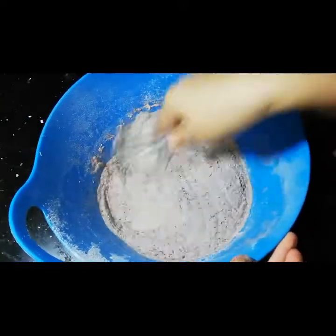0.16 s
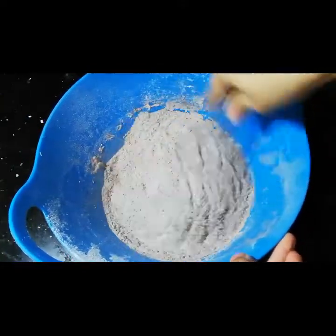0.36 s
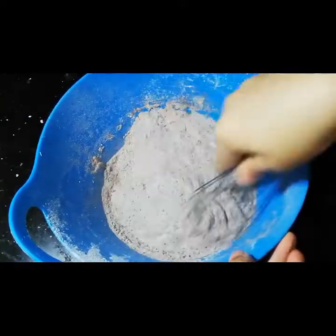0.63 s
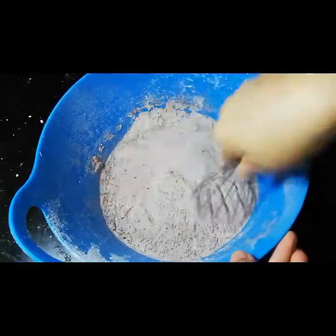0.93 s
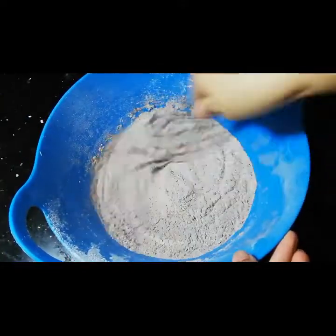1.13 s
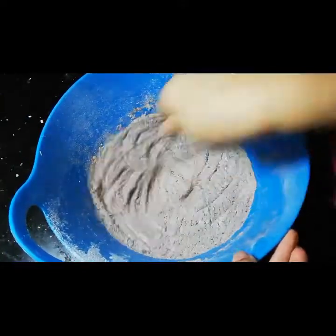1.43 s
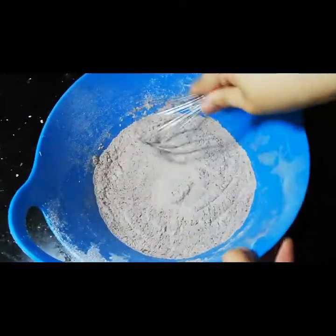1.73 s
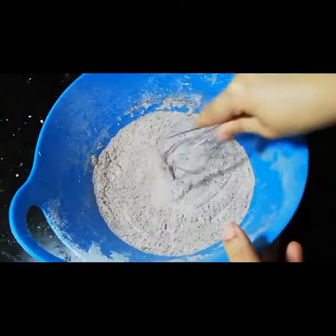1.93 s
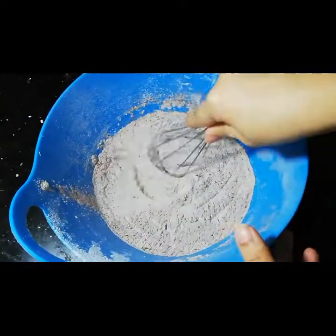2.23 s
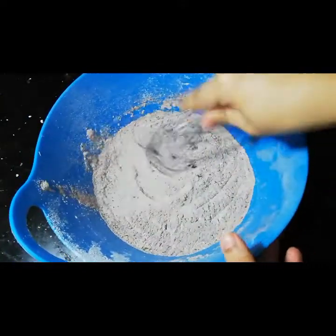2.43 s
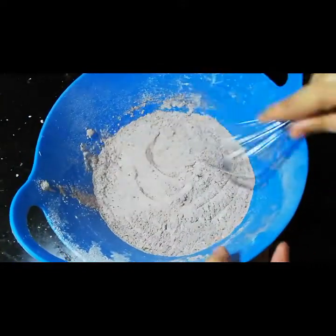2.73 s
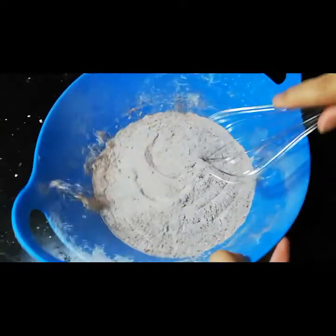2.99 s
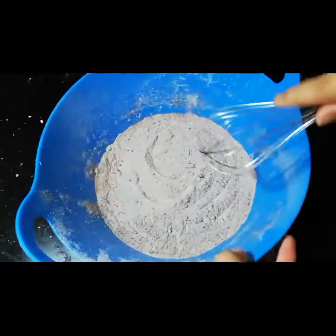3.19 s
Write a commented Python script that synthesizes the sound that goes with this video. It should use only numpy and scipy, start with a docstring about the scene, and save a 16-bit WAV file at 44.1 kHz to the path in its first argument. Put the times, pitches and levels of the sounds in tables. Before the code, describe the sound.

A wire whisk scrapes through dry powder in a plastic bowl with quick uneven strokes and small knocks, pauses, then is tapped clean on the wall; close stereo microphones in a small, quiet kitchen.

```python
"""Whisk in a powder bowl

A wire whisk scrapes in quick strokes through dry powder in a plastic bowl, then knocks and is tapped clean on
the wall. Dense noise grains, filtered and rung through bowl modes, make the hiss; damped sines and shaped noise
make the knocks; a sine hums in the wires after the taps with the strongest cracks. A small kitchen adds
decaying-noise echoes and a low rumble. Two spaced microphone ports pick it up, the right one with a bright
resonance."""
import sys
import numpy as np
from scipy import signal
from scipy.fft import rfft, irfft
from scipy.io import wavfile
from scipy.ndimage import uniform_filter1d

SR = 44100
rng = np.random.default_rng(int(sys.argv[2]) if len(sys.argv) > 2 else 0)


def dump(signal):
    """Clip the signal to [-1, 1] and save it as 16-bit WAV at the path in sys.argv[1]."""
    limited = np.clip(np.atleast_2d(signal).T, -1, 1)
    pcm = np.round(limited * 32767).astype(np.int16)
    wavfile.write(sys.argv[1], SR, pcm)


N = 147735  # length [samples]
TIME = np.arange(N) / SR  # [s]

# Tone of powder scraped by the wires: (frequency [Hz], relative density [dB per Hz])
SCRAPE_TONE = [(120, -85), (200, -22.5), (709, -12.5), (806, -2.5), (1140, -3), (1480, 5), (1810, -1),
               (2510, 2), (5130, -0.5), (7540, -13), (8740, -7), (14600, -18.5), (16000, -28)]
# Low modes of the bowl wall: (frequency [Hz], relative level [dB], T60 [s])
WALL_MODES = [(188, -19, 0.12), (320, 3.5, .04), (446, -5, 0.02), (620, 20, 0.075), (790, 34.5, 0.022),
              (848, 20, 0.09), (890, -34, 0.021), (1160, -11, 0.075), (1150, -7.5, 0.03)]
# Whisk against the bowl: (time [s], nominal peak [dB], thud [dB], thud centre [Hz], crack [dB],
# crack centre [Hz], treble [dB], loosened powder [dB], left over right [dB]); part levels are relative to the peak
KNOCKS = [(0.15, -45, -41, 1130, -10.5, 1700, -33, -40, 9), (0.217, -30, -11, 630, -12, 1400, -21, -42, 2),
          (0.453, -37.5, -40, 950, -11.5, 2530, -23, -40, -0.5),
          (0.511, -35, -1, 890, -12.5, 1400, -49, -34, -2),
          (0.617, -33.5, -44, 860, -13, 1550, -55, -40, 0),
          (0.72, -39, -8.5, 720, -10.5, 2540, -14, -44, -0.5),
          (0.945, -43.5, -28, 600, -4.5, 1610, -27, -40, -2),
          (1.229, -37, -32, 960, -13, 4250, -32, -38, 3), (1.318, -40, -17, 743, -3, 1660, -19, -42, 4),
          (1.93, -42.5, 2.5, 349, -15, 1500, -36, -39, 6),
          (2.056, -26.5, -5, 710, -10.5, 1250, -17, -36.5, 0.5),
          (2.228, -35.5, -1, 844, -9, 1390, -26, -48, 4),
          (2.261, -48.5, -34, 719, -7.5, 3250, -24, -39, -3),
          (2.387, -28.5, -5, 840, -7, 1500, -17, -37, 0), (2.911, -22, -60, 1080, -7, 2570, -13.5, -29, -3),
          (3.007, -35, -1.5, 750, -18, 2520, -35, -26, 4.0),
          (3.076, -25.5, -18.5, 1100, -3, 2840, -10.5, -26.5, -1.5),
          (3.133, -43.5, 0, 337, -12.5, 2640, -40, -44, 6),
          (3.238, -33.5, -6, 1123, 2.5, 2870, -0.5, -20, -1.5)]

SPLIT_HZ = 2770  # between body and treble
PING_WIDTH_HZ = 260
TAPPING_FROM_S = 2.9  # the whisk is tapped clean from here on


def undb(db):
    """Decibels to a linear gain."""
    return 10 ** (np.asarray(db) / 20)


def unit(x):
    """Scale to an RMS of 1."""
    return x / np.sqrt(np.mean(x ** 2))


def curve(rows, axis):
    """A table column joined by straight lines in time."""
    rows = np.array(rows)
    return np.interp(TIME, rows[:, 0], rows[:, axis])


def colour(x, table):
    """Causal minimum-phase filter with the gain of (Hz, dB) points."""
    table = np.array(table)
    f = np.linspace(1, SR / 2, 2049)
    log_gain = np.interp(np.log(f), np.log(table[:, 0]), table[:, 1]) * np.log(10) / 20
    cepstrum = irfft(log_gain)
    # folding the cepstrum forward in time makes the filter causal
    cepstrum[1:2048] *= 2
    cepstrum[2049:] = 0
    impulse = irfft(np.exp(rfft(cepstrum)))
    return signal.fftconvolve(x, impulse)[:len(x)]


def band(x, lo_hz, hi_hz):
    """Gentle band-pass."""
    return signal.sosfilt(signal.butter(2, [lo_hz, hi_hz], "band", fs=SR, output="sos"), x)


def highpass(x, hz):
    """Gentle high-pass."""
    return signal.sosfilt(signal.butter(2, hz, "high", fs=SR, output="sos"), x)


def resonance(x, hz, width_hz):
    """One ringing mode of the given bandwidth."""
    return signal.lfilter(*signal.iirpeak(hz, hz / width_hz, SR), x)


def walk(rate):
    """Random levels held 1 / rate s and slewed twice; spread 1."""
    hold = int(SR / rate)
    steps = np.repeat(rng.standard_normal(N // hold + 1), hold)
    smooth = uniform_filter1d(uniform_filter1d(steps, hold), hold)[:N]
    return smooth / smooth.std()


def pair(make):
    """Left and right share part of the sound; the shared part reaches the right port a little late."""
    shared, lag_s = 0.13, .0003  # shared power fraction
    both = make()
    late = np.roll(both, int(lag_s * SR))
    return np.array([np.sqrt(shared) * b + np.sqrt(1 - shared) * make() for b in (both, late)])


def grains():
    """Powder crushed under the wires: dense clicks of random size, some much larger."""
    per_s, spread_db = 12000, 1.6
    on = rng.random(N) < per_s / SR
    size = rng.standard_normal(N) * undb(spread_db * rng.exponential(size=N))
    return unit(on * size)


def bowl(x):
    """The plastic wall rings at its modes, each coming and going at random as the wires move over it."""
    # ringing modes: (frequency [Hz], width [Hz], relative level [dB])
    modes = [(797, 57, -35), (1240, 75, 4), (1384, 50, -10), (2540, 51, 5), (3250, 100, -15.5),
             (4770, 46, 0), (5550, 360, 9), (6450, 920, 12)]
    catch_db = 5
    ring = 0
    for hz, width_hz, db in modes:
        level = undb(db + catch_db * walk(29.33))
        ring = ring + level * resonance(x, hz, width_hz) / np.sqrt(width_hz)
    return ring


def ticks():
    """Single wires snag at random and ping as short decaying sines, each at its own pitch."""
    per_s = 110
    out, t = np.zeros(N + 512), np.arange(512) / SR
    decay = np.exp(-np.pi * PING_WIDTH_HZ * t / 2)
    for at, pitch, size in rng.random((int(per_s * N / SR), 3)):
        ping = np.sin(2 * np.pi * 1200 * 4 ** pitch * t) * decay  # 1200 to 4800 Hz
        out[int(at * N):][:512] += size ** 2 * ping
    return unit(out[:N])


def grit(treble):
    """Grains heard directly and through the bowl; each band swells in patches as wires catch and slip."""
    ring_db, tick_db, patchy_db = -5.5, -9, 2.2
    g = grains()
    x = unit(colour(g, SCRAPE_TONE)) + undb(ring_db) * unit(bowl(g)) + undb(tick_db) * ticks()
    edges = 1000 * 1.4 ** np.arange(9)  # [Hz]
    lows = [signal.sosfiltfilt(signal.butter(2, hz, fs=SR, output="sos"), x) for hz in edges] + [x]
    # differences of neighbouring low-passes are the bands
    bands = [undb(patchy_db * walk(60.17)) * (hi - lo) for lo, hi in zip(lows, lows[1:])]
    body = unit(sum(b for b, hz in zip(bands, edges) if hz <= SPLIT_HZ))
    top = unit(sum(b for b, hz in zip(bands, edges) if hz > SPLIT_HZ))
    return body + treble * top


def boom():
    """The bottom of the bowl rumbles under the stroke: low-band grains of wavering level."""
    low = band(colour(grains(), SCRAPE_TONE), 237, 767)
    return unit(undb(2.2 * walk(39.44)) * low)


def whisk():
    """Level curves shape the grit and boom into strokes, then into loose powder sliding faintly."""
    # one curve per stroke: (time [s], scrape level [dB], boom [dB to scrape], treble [dB to scrape])
    stroke_curves = [
        [(0.0, -42.5, -9, -2.5), (0.064, -61, -3.5, -9), (0.09, -50.5, -5.5, -1), (0.102, -63, -22, -16),
         (0.135, -66, -19, -10)],
        [(0.14, -74, -11, 0), (0.146, -47.5, -9, -6), (0.156, -45, -1, -10), (0.176, -51, -20, -7),
         (0.205, -60, -9, -13)],
        [(0.21, -58, -1, -4), (0.216, -48.5, 5.5, -7.5), (0.262, -42.5, -12, -7.5), (0.308, -47.5, 0.5, -1.5),
         (0.402, -67, -10.5, -6.5), (0.44, -74, -22, -2)],
        [(0.445, -78, -27, -2), (0.451, -57.5, 13.5, -15), (0.471, -52, -37, -8), (0.5, -66, -21, -16)],
        [(0.505, -71, -5, -12), (0.513, -53, 11, 0), (0.527, -71.5, 23, 4), (0.535, -60, -24, -5),
         (0.577, -48.5, -7, -3), (0.61, -69, -18, -2)],
        [(0.612, -57, 2.5, -13), (0.62, -46.5, 1, -3), (0.644, -44, -13, -7), (0.688, -63.5, -27, -8),
         (0.71, -62, -10, -23)],
        [(0.715, -63, -4, -6), (0.723, -54.5, 0, -3), (0.757, -42, -8.5, 1), (0.805, -42, -8, -4),
         (0.827, -53, 0, 1.5), (0.871, -39, -12.5, -9), (0.907, -67, -29, -9), (0.935, -61, -21, -7)],
        [(0.94, -72, -23, -15), (0.95, -47, -9, -3.5), (1.002, -48, -6, -2), (1.068, -40, -9, -4),
         (1.1, -51.5, -2.5, 0), (1.15, -43, -4, -7.5), (1.22, -58.5, -30, -2)],
        [(1.222, -61, -3, 2), (1.234, -48.5, 0, -0.5), (1.268, -49, -27, -5.5), (1.284, -60.5, -9, -4),
         (1.3, -48.5, -2, -1)],
        [(1.305, -56, -9, -0.5), (1.331, -42, -0.5, -2.5), (1.389, -46.5, -12.5, -3.5), (1.415, -38.5, -16, -9),
         (1.451, -50.5, 5.5, -4), (1.477, -41.5, -11.5, -6), (1.505, -53, -4, -4), (1.66, -77, -8, -9.5)],
    ]
    # powder sliding back and shaken off the wires: (time [s], level [dB])
    sift_curves = [
        [(1.66, -74), (1.756, -77.5), (1.784, -73.5), (1.802, -77), (1.91, -86), (1.92, -68)],
        [(2.5, -69), (2.594, -118), (2.66, -82.5), (2.804, -72), (2.896, -81), (2.9, -74)],
    ]
    strokes = sum(stroke_curves, [])
    press = undb(curve(strokes, axis=1)) * (TIME < sift_curves[0][0][0])
    sift = sum(undb(np.interp(TIME, *np.array(s).T, left=-120, right=-120)) for s in sift_curves)
    treble = undb(curve(strokes, axis=3))
    hiss = pair(lambda: grit(treble))
    return hiss * (press + sift) + pair(boom) * press * undb(curve(strokes, axis=2))


def room(x):
    """Diffuse echoes of a small hard room: decaying noise, the treble dying first."""
    t60_s, treble_t60_s, gap_s, level_db = 0.34, 0.27, 0.0013, -11.5
    t = np.arange(SR // 2) / SR
    out = []
    for ch in x:
        n = rng.standard_normal(len(t)) * (t > gap_s)
        tail = band(n, 100, 3100) * undb(-60 * t / t60_s)
        tail += band(n, 2440, 13500) * undb(-60 * t / treble_t60_s)
        out.append(signal.fftconvolve(ch, tail / np.sqrt(np.sum(tail ** 2)))[:N])
    return undb(level_db) * np.array(out)


def kitchen():
    """Quiet filtered noise, alike left and right in the bass, and a wavering rumble of resonant noise."""
    # room tone: (frequency [Hz], relative density [dB per Hz])
    room_tone = [(15, -9), (25, -2.5), (114, 0), (242, -6.5), (354, -8), (624, -18), (1940, -22.5),
                 (2220, -33), (3820, -32.5), (4370, -25), (5430, -30), (16000, -42)]
    # lower part of the rumble: (time [s], level [dB])
    rumble = [(0.0, -77), (0.04, -69.5), (0.25, -72), (0.28, -55), (0.32, -61), (0.38, -61.5), (0.72, -62),
              (0.89, -55), (0.95, -67.5), (1.46, -60), (1.79, -65.5), (1.84, -61.5), (2.19, -72.5),
              (2.43, -65.5), (2.82, -75), (2.95, -55), (3.13, -65), (3.35, -52.5)]
    air_db, low_hz, low_width_hz, upper_hz, upper_db = -71.5, 109, 20, 165, -8
    mid, side = (colour(rng.standard_normal(N), room_tone) for _ in range(2))
    side = highpass(side, 220)
    air = (mid + side * np.array([[1], [-1]])) * undb(air_db) / mid.std()
    low = resonance(resonance(rng.standard_normal(N), low_hz, low_width_hz), low_hz, 2 * low_width_hz)
    upper = resonance(resonance(rng.standard_normal(N), upper_hz, 75), upper_hz, 100)
    return air + (unit(low) + undb(upper_db) * unit(upper)) * undb(curve(rumble, axis=1))


def thud(t, centre_hz):
    """Damped sines of the wall; modes near the centre ring most, and where the blow lands sets it."""
    octaves = 0.14  # reach of the blow
    x = 0
    for hz, db, t60 in WALL_MODES:
        nearness = 1 / (1 + (np.log2(hz / centre_hz) / octaves) ** 2)
        x = x - np.sin(2 * np.pi * hz * t) * undb(db - 60 * t / t60) * nearness
    x = highpass(x, 150)
    return x / np.abs(x).max()


def knock_rise(s, db):
    """Time constant [s] of a knock's swell, slower for the hard taps."""
    return .0012 if db > -33 and s > TAPPING_FROM_S else .0003


def knocks():
    """Wires close in, crack and rattle as shaped noise on the thudding wall, and powder shakes loose."""
    crack_s, rattle_s, rattle_db, shake_s = .0032, 0.028, -17.5, 0.1  # decay time constants
    ping_db, strike_db = -2, 3
    out, t = np.zeros((2, N + SR)), np.arange(SR) / SR
    noise, powder = pair(grains), pair(lambda: grit(0.36))
    top = np.array([unit(band(band(n, SPLIT_HZ, 11160), SPLIT_HZ, 11160)) for n in noise])
    for s, db, thud_db, thud_hz, crack_db, crack_hz, treble_db, powder_db, pan_db in KNOCKS:
        rise = knock_rise(s, db)
        i = int((s - 4 * rise) * SR)
        j = rng.integers(N - SR)  # random stretch of noise and powder
        u = t - 6 * rise  # time from the crack's peak
        a = np.abs(u)
        snap = np.exp(-a / crack_s)
        fall = snap + undb(rattle_db) * np.exp(-a / rattle_s)
        n = noise[:, j:j + SR]
        ping = unit(resonance(n, crack_hz, PING_WIDTH_HZ))
        mid = unit(band(n, 850, 4220)) + undb(ping_db) * snap / fall * ping  # the ping dies with the snap
        envelope = np.where(u < 0, np.exp(-a / rise), fall)
        crack = envelope * (undb(crack_db) * mid + undb(treble_db) * top[:, j:j + SR])
        shaken = undb(powder_db) * (u > 0) * np.exp(-a / shake_s) * powder[:, j:j + SR]
        wall = undb(thud_db) * thud(np.maximum(u + rise, 0), thud_hz)
        level = undb(db + strike_db + np.array([[pan_db], [-pan_db]]) / 2)
        out[:, i:i + SR] += level * (wall + crack + shaken)
    return out[:, :N]


def rocking():
    """The bowl rocks on the counter: swelling, damped sines at its lowest wall mode."""
    # rocking bumps: (time [s], nominal peak [dB])
    bumps = [(1.82, -53), (2.776, -49)]
    out, t = np.zeros(N + SR), np.arange(SR) / SR
    hz, _, t60 = WALL_MODES[0]
    for s, db in bumps:
        swell = 1 - np.exp(-t / 0.0061)
        out[int(s * SR):][:SR] += np.sin(2 * np.pi * hz * t) * swell * undb(db - 60 * t / t60)
    return out[:N]


def wire_hum():
    """Taps with a strong crack leave the wires humming: a decaying sine of wavering level."""
    hz, hum_db, t60_s, from_db = 176, -31, 1.5, -36  # hum level is relative to the crack
    out, t = np.zeros(N + SR), np.arange(SR) / SR
    for s, db, _, _, crack_db, *_ in KNOCKS:
        if s > TAPPING_FROM_S and db + crack_db > from_db:
            i = int((s - 4 * knock_rise(s, db)) * SR)
            tone = np.sin(2 * np.pi * hz * (t + i / SR))  # successive hums stay in phase
            out[i:i + SR] += tone * undb(db + crack_db + hum_db - 60 * t / t60_s)
    return out[:N] * undb(2.5 * walk(25))


def scene():
    """Whisk and knocks with their echoes, over hum, rocking and the kitchen."""
    near = whisk() + knocks()
    return near + room(near) + rocking() + wire_hum() + kitchen()


def record(dry):
    """The two ports colour the sound differently, the right one resonates in the treble; the top is cut."""
    # tilt between the ports ahead of the resonance: (frequency [Hz], right over left [dB])
    port_tilt = [(120, 0), (260, 4), (500, -4), (1000, -2), (2500, -3), (4500, -3), (7000, 5), (10500, 7),
                 (14000, 4)]
    port_hz, port_width_hz, port_db, top_hz = 8750, 900, 6, 16050
    # each port takes half the tilt, in opposite directions
    halves = [[(hz, k * db / 2) for hz, db in port_tilt] for k in (-1, 1)]
    left, right = (colour(ch, half) for ch, half in zip(dry, halves))
    right = right + undb(port_db) * resonance(right, port_hz, port_width_hz)
    return signal.sosfilt(signal.ellip(10, .2, 70, top_hz, fs=SR, output="sos"), [left, right])


dry = scene()
out = record(dry)
dump(out)
```